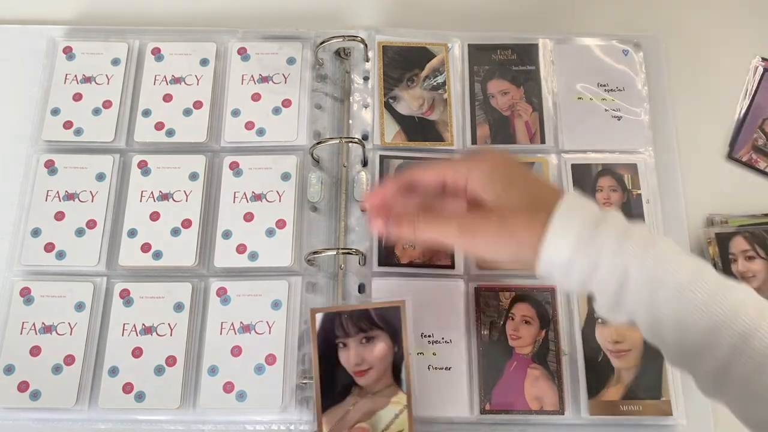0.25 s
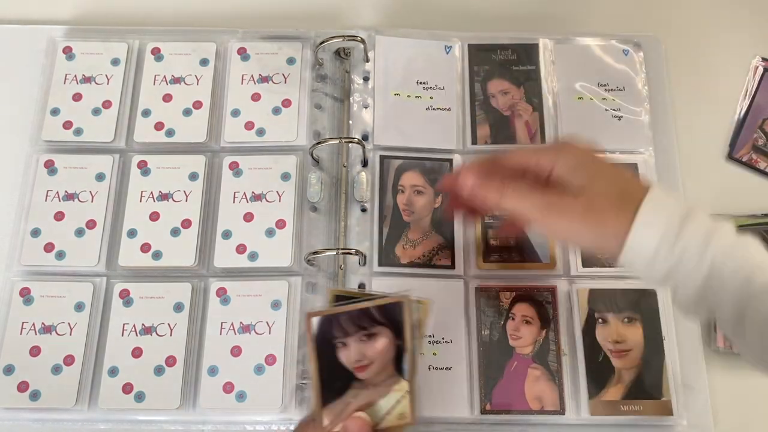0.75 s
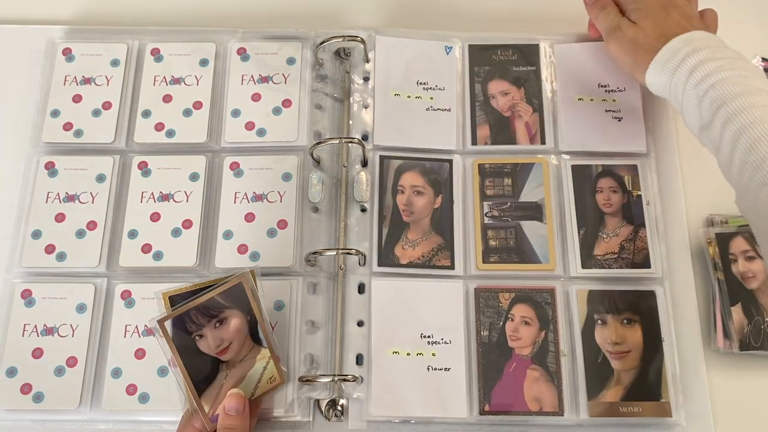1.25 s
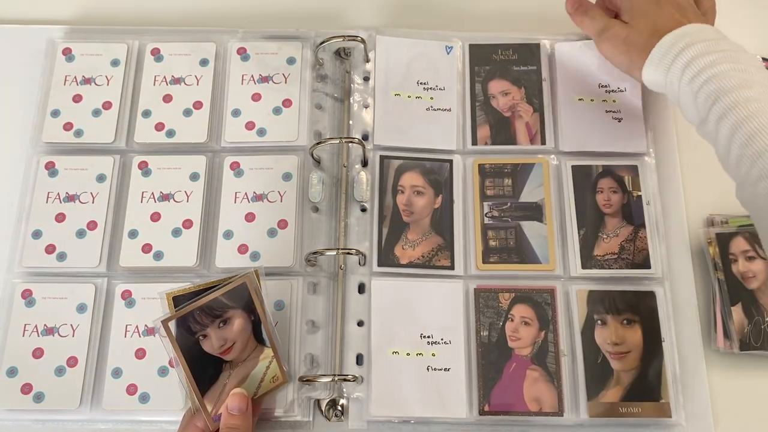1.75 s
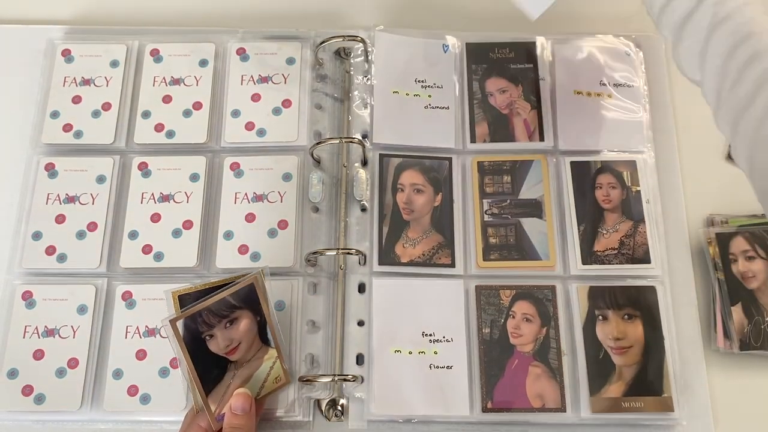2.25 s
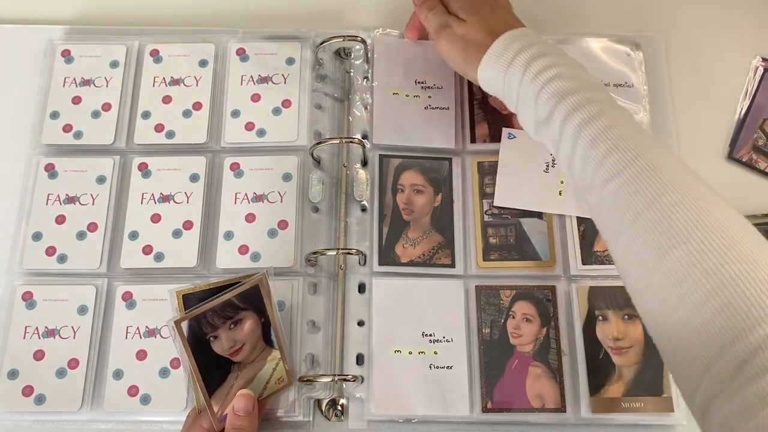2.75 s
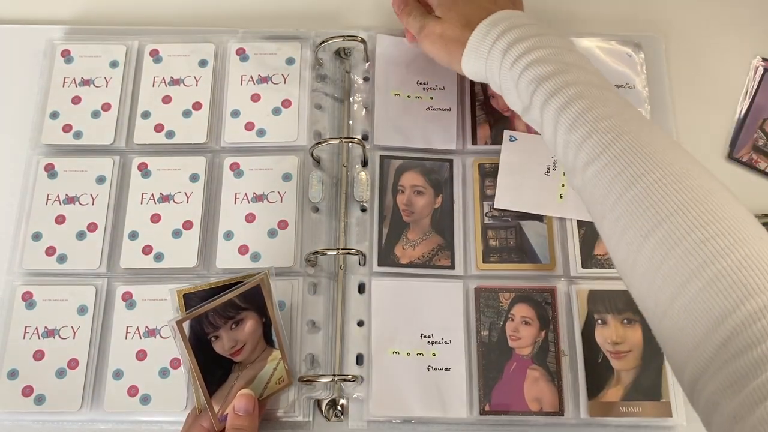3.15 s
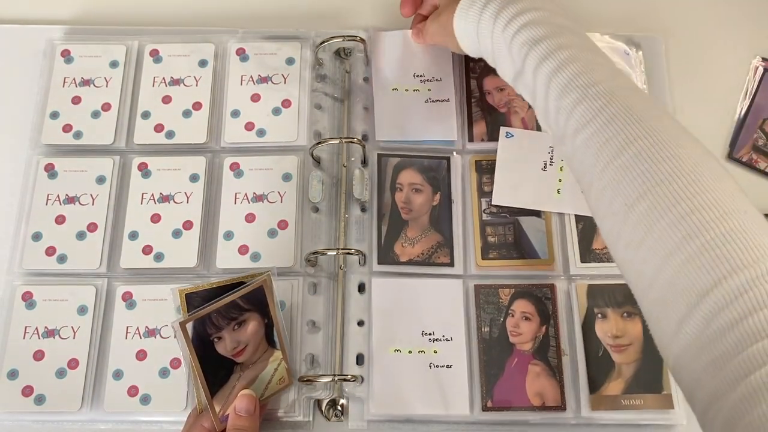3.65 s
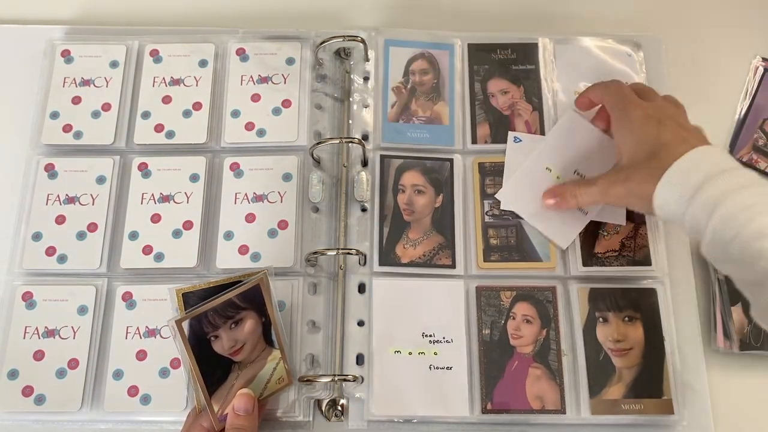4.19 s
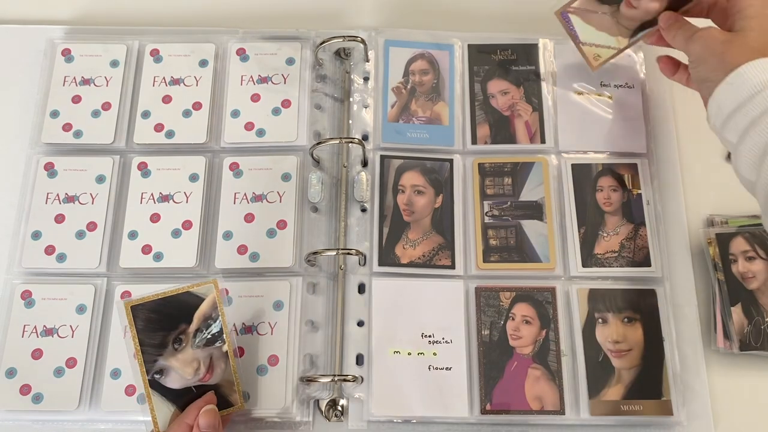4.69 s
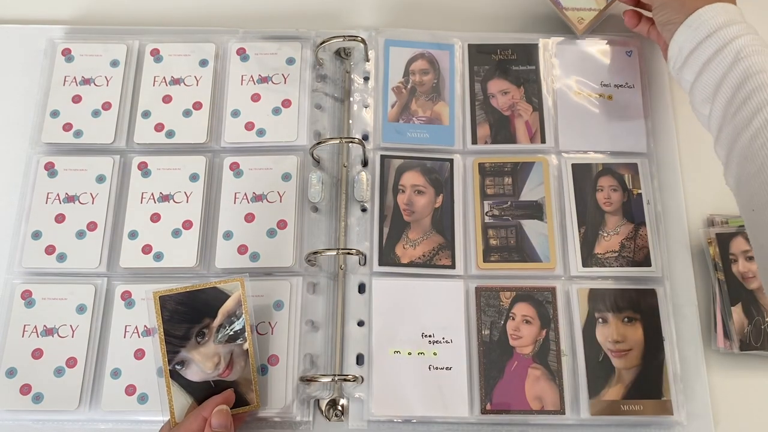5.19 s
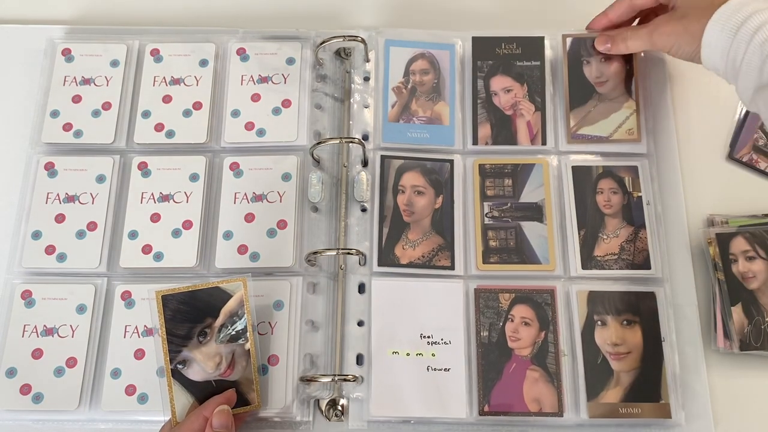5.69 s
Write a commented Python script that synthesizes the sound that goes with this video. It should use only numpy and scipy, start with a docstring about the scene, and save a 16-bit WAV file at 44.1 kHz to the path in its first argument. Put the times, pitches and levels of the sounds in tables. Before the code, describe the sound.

Close to the microphone in a small quiet room, cards slide through plastic binder pockets. Faint ticks and soft rubs come first, then a fuller rustle around two seconds, hard crinkling snaps at three, dense sliding and one very sharp bright click just after four, then mostly quiet with a small crackle.

```python
"""A desk in a small quiet room: a hand slides cards in and out of plastic binder pockets, right under a phone.
Film creases snap as noise bursts around a ring, with a bright edge and the binder's dull modes.
Card rubs on film in short strokes of banded stick-slip noise; soft low thuds are damped sines.
A few thin tones and one faint gliding squeak join in, over a low room tone."""
import sys
import numpy as np
from scipy import signal
from scipy.fft import rfft, irfft
from scipy.io import wavfile
from scipy.ndimage import uniform_filter1d

SR = 44100
rng = np.random.default_rng(int(sys.argv[2]) if len(sys.argv) > 2 else 0)


def output_pcm(signal):
    """Save a mono or channel-first signal as 16-bit PCM at the path in sys.argv[1].

    Samples are clipped to [-1, 1] before scaling.
    """
    pcm = np.clip(np.atleast_2d(signal).T, -1, 1) * 32767
    wavfile.write(sys.argv[1], SR, np.round(pcm).astype(np.int16))


N = 261638

# room tone spectrum before overall scaling: pitch_hz, relative_density_db
AIR_SPECTRUM = [(18, -45), (30, -29), (61, -12.5), (102, -1), (381, -10.5), (718, -13), (1130, -16.5),
                (1840, -18.5), (2980, -26), (4250, -27), (4830, -28.5), (10300, -31), (13000, -29.5)]
# room tone likeness of left and right: pitch_hz, likeness (1 same, -1 opposite)
AIR_LIKENESS = [(60, 1), (130, 0.92), (290, 0.93), (640, 0.076), (1410, -0.94), (3100, 0.047),
                (6820, 0.188), (15000, -0.43)]
# phase-gap strength between the microphone ports, before trim and wander: pitch_hz, relative_side_db
PORT_SIDE = [(60, -21.5), (200, -15), (700, -5), (1300, 1.5), (2400, -8.5), (4400, -8), (8000, 0.5),
             (11000, -11.5), (12000, 4), (13500, 21.5)]
# where the hand is: time_s, left_minus_right_db
HAND_PAN = [(0, 0), (1, 0), (2.5, -0.5), (3.1, -1), (4.1, -1), (4.2, 0.7), (4.5, 0.2), (5.2, -1), (5.93, 1)]
# one faint gliding squeak: start_s, length_s, level_db, from_hz, to_hz
SQUEAK_GLIDE = (5.08, .145, -80, 2050, 1730)
# short thin tones sounding with a knock or snap: start_s, level_db, pitch_hz, t60_s
THIN_TONES = [(.577, -58, 5650, .075), (2.357, -39, 3220, .022), (4.2321, -7, 10500, .006)]
# hand or card landing on the padded page: start_s, level_db, pitch_hz
LANDINGS = [(0.038, -54, 290), (0.535, -49.5, 163), (0.58, -44, 270), (3.859, -54.5, 276),
            (3.888, -56, 378), (3.966, -53, 212), (4.191, -52, 142), (4.291, -48, 237), (4.34, -48, 433),
            (4.628, -46, 94)]
# strokes of card on film: crest_s, nominal_length_s, level_db, brightness_octaves (above the page drag)
RUB_STROKES = [(0.018, 0.06, -65, 4), (0.031, 0.084, -58, 4), (0.333, 0.043, -64.5, 4.5),
               (0.41, 0.15, -56.5, 5), (0.515, 0.07, -53.5, 4.5), (0.583, 0.038, -50, 1.2),
               (0.679, 0.046, -58, 3), (0.694, 0.022, -57, 3), (0.955, 0.074, -55, 5),
               (1.158, 0.11, -66, 3), (1.442, 0.097, -67.5, 3), (1.769, 0.15, -54.5, 3.5),
               (1.808, 0.16, -51.5, 3.5), (1.941, 0.066, -49.5, 3.5), (1.968, 0.063, -49, 4),
               (2.007, 0.11, -43.5, 4), (2.078, 0.23, -47, 3), (2.187, 0.11, -43.5, 4),
               (2.169, 0.19, -48.5, 2), (2.22, 0.064, -49, 1.8), (2.249, 0.035, -50, 1.4),
               (2.298, 0.026, -53, 2.1), (2.343, 0.15, -50.5, 4.5), (2.379, 0.11, -52, 4.5),
               (2.528, 0.11, -60.5, 4), (2.826, 0.12, -69, 9), (3.106, 0.075, -48.5, 3.5),
               (3.33, 0.044, -51.5, 2.5), (3.392, 0.14, -49, 4), (3.442, 0.07, -44, 1.4),
               (3.543, 0.042, -52, 3), (3.602, 0.04, -56.5, 4), (3.772, 0.042, -48.5, 4),
               (3.83, 0.083, -47, 5), (3.866, 0.03, -44, 4), (3.87, 0.094, -43.5, 4),
               (3.877, 0.075, -60, 0.4), (3.905, 0.12, -43.5, 3), (3.926, 0.056, -45, 2),
               (3.977, 0.056, -51.5, 1.27), (4.048, 0.062, -51, 2.5), (4.124, 0.25, -58.5, 3.5),
               (4.227, 0.19, -46, 4), (4.382, 0.37, -57.5, 0.12), (4.338, 0.046, -48.5, 1.5),
               (4.37, 0.073, -46.5, 4), (4.408, 0.12, -57, 4), (4.64, 0.088, -64.5, 3.5),
               (4.629, 0.17, -62.5, -0.6), (4.719, 0.16, -67.5, 0), (5.041, 0.3, -72.5, 0.4),
               (5.327, 0.053, -55.5, 2), (5.36, 0.058, -49.5, 2), (5.498, 0.14, -59, 4),
               (5.549, 0.24, -65.5, 0), (5.558, 0.1, -61.5, 3.5), (5.64, 0.11, -62, 4)]
# rub layers hiss, crackle, binder scrape, page drag: brightness_octaves
LAYER_OCTAVES = (3.7, 2.1, .9, 0)
# weakening of layers below, above the stroke's brightness: slope_db_per_octave
LAYER_SLOPES = (-9, -7)
# binder modes before each blow's random shift: pitch_hz, level_db, t60_s
BINDER_MODES = [(290, -10, 0.039), (483, -5.5, 0.039), (637, -8.5, 0.045), (808, -3, 0.052),
                (971.5, 0.15, 0.063), (1052, -1, 0.02905), (1248, -16, 0.024), (1500, -1.5, 0.039)]
# creases snapping and card edges tapping: start_s, level_db, film_ring_hz, bright_edge_db, binder_ring_db
# (the last two relative to the snap)
CREASE_SNAPS = [(0.0296, -46.5, 6520, -9, -28), (.039, -53.5, 2900, -25, -25), (.198, -46, 5470, 4, -12.5),
                (.529, -44.5, 4830, 6.5, -11.5), (.576, -36.5, 1560, -12, -5.5),
                (.659, -50, 5550, -24, -37), (.671, -45, 5170, -26, -19), (.711, -48.5, 8760, -4, -42),
                (.836, -57.5, 2290, 4, -11.5), (0.958, -46.5, 2100, 6, -17.5), (1.145, -46.5, 2610, -2, -9),
                (1.171, -48, 1700, 6, -9), (1.211, -52, 2250, 8.5, -14.5), (1.256, -50.5, 7500, 7, -23),
                (1.307, -52, 3650, 0, -28), (1.355, -51, 11600, -10, -20.5), (1.39, -57, 2770, 6, -9),
                (1.609, -54.5, 2650, -5, -13.5), (1.781, -38, 10650, -15, -34),
                (1.788, -45, 1630, -14, -34), (1.801, -39, 3070, -21, -15), (1.918, -47, 9800, -19, -11.5),
                (1.927, -46, 4150, -21, -15.5), (1.94, -44, 2500, -23, -18), (1.946, -39.5, 5500, -19, -34),
                (1.955, -41, 3880, -20, -10.5), (1.981, -40.5, 6050, -15, -23),
                (2.002, -30, 3790, 3, -21.5), (2.06, -32.5, 2320, -28, -10.5),
                (2.086, -50.5, 1200, -30, -5), (2.143, -46.5, 3500, -13, -9), (2.204, -34.5, 2680, 0, -9),
                (2.212, -30.5, 2230, -36, -17.5), (2.22, -40, 1860, -30, -22), (2.285, -39, 905, -51, -9.5),
                (2.356, -34, 3150, -11, -25), (2.371, -45, 3100, -15, -16), (2.623, -53, 11300, -19, -24),
                (2.824, -44.5, 4900, -14, -18), (2.833, -33.5, 4450, -7, -30),
                (2.903, -52.5, 2690, -24, -21), (3.036, -34.5, 4930, -1, -15),
                (3.044, -29.5, 4700, -6, -17.5), (3.046, -23.5, 5050, 5.5, -26),
                (3.092, -23, 4770, -24, -42), (3.098, -20, 2900, 5.5, -29),
                (3.139, -34.5, 4650, 5.5, -17.5), (3.277, -48.5, 4900, 5.5, -43),
                (3.328, -44, 8950, -15, -19), (3.392, -39, 2700, 4, -14.5),
                (3.443, -35.5, 2100, 2.5, -11.5), (3.543, -39, 6620, -28, -15.5),
                (3.641, -44.5, 1750, -12, -37), (3.744, -46.5, 3980, -17, -37),
                (3.785, -35, 4500, -27, -27.5), (3.825, -49, 5250, 9, -25), (3.867, -44, 2620, -8, -9),
                (3.938, -36.5, 11700, -17, -41), (4.05, -29.5, 2700, -31, -22.5),
                (4.053, -24.5, 3190, -37, -33), (4.123, -42, 3340, 1.5, -31),
                (4.189, -53.5, 1400, -5.5, -26), (4.213, -48, 2980, 12, -27),
                (4.2313, -13.5, 10700, 1, -41.5), (4.232, -32, 1680, -30, -19),
                (4.29, -35.5, 3550, -28, -17), (4.338, -38.5, 2850, -28, -6.5),
                (4.398, -32.5, 10330, -37, -29), (4.399, -39, 1500, -30, -22),
                (4.472, -55, 5950, -19.5, -30), (4.495, -48.5, 4140, -39, -14), (5.185, -63, 3900, -5, -35),
                (5.301, -58, 3600, -19.5, -35), (5.336, -42.5, 2940, -19, -38),
                (5.344, -41, 2380, -26.5, -42), (5.351, -37.5, 2230, -30, -39),
                (5.362, -45, 3300, -29, -33), (5.651, -52, 4830, 1, -16), (5.803, -46, 1963, 6.5, -14)]

AIR_DB = -69
ROOM_T60_S, ROOM_DB = 0.19, -12
SIDE_WANDER = 0.67  # depth of the random wavering of the side share
SWELL_SHARE = 0.48  # a free stroke swells over this share of its length
LET_GO_S = 0.0092  # swell of a stroke set loose by a snap
STUCK_S = 0.025  # a snap this close before the crest sets the stroke loose
GRIP_DB, BAND_SLOW_DB, BAND_FAST_DB = 0.9, 1.4, 2.96  # random level spreads of the rub
RELEASE_MS, RELEASE_CYCLES = 0.62, 0.67  # release time plus cycles of the film ring
SETTLE_S, SETTLE_DB = 0.0025, -10  # quick settling after the release
FLUTTER_T60_S, FLUTTER_DB = 0.099, -11.5
BUILD_S, BUILD_DB = 0.0013, -10  # creak growing just before the crease lets go
TOP_HZ = 16700  # upper limit of the sound


def undb(db):
    """Decibels to gain."""
    return 10 ** (np.asarray(db) / 20)


def unit(x):
    """Scale to rms 1."""
    return x / np.sqrt(np.mean(x ** 2))


def peak_unit(x):
    """Scale to peak 1."""
    return x / abs(x).max()


def decay(t, t60_s):
    """Exponential fade of 60 dB in t60_s."""
    return np.exp(-np.log(1000) * t / t60_s)


def band(x, lo_hz, hi_hz, order=2):
    """Band-pass between two edges."""
    edges_hz = [lo_hz, min(hi_hz, 0.45 * SR)]
    return signal.sosfilt(signal.butter(order, edges_hz, "band", fs=SR, output="sos"), x)


def spectrum_curve(table):
    """Interpolate a table's second column over log frequency."""
    log_hz = np.log(np.maximum(np.arange(N // 2 + 1) * SR / N, 1))
    hz, value = np.transpose(table)
    return np.interp(log_hz, np.log(hz), value)


def add(out, start_s, x):
    """Mix x into out from start_s."""
    i = int(start_s * SR)
    out[i:i + len(x)] += x[:len(out) - i]


def event():
    """Empty track and the time axis of one short event."""
    return np.zeros(N), np.arange(int(0.15 * SR)) / SR


def walk(rate_hz):
    """Random levels held 1 / rate_hz and slewed twice; spread near 1."""
    hold = int(SR / rate_hz)
    steps = np.repeat(rng.standard_normal(N // hold + 1), hold)
    return 1.3 * uniform_filter1d(uniform_filter1d(steps, hold), hold)[:N]


def grit(rate_hz, spread_db):
    """Sparse slips of very uneven size, scaled to rms 1."""
    slips = (rng.random(N) < rate_hz / SR) * rng.standard_normal(N)
    return unit(slips * undb(spread_db * rng.exponential(size=N)))


def air():
    """Room tone: noise mostly low; left and right share more or less of it by pitch."""
    gain = undb(spectrum_curve(AIR_SPECTRUM))
    like = np.clip(spectrum_curve(AIR_LIKENESS), -0.99, 0.99)
    mid, side = (irfft(rfft(rng.standard_normal(N)) * gain * np.sqrt(1 + sign * like), N) for sign in (1, -1))
    level = undb(AIR_DB + 0.27 * walk(1.0))
    return level * np.array([mid + side, mid - side]) / mid.std()


def room(x):
    """A short damped room tail of decaying noise, different on each side."""
    t = np.arange(int(0.4 * SR)) / SR
    tail = rng.standard_normal((2, len(t))) * decay(t, ROOM_T60_S) * np.minimum(t / 0.0015, 1)
    echo = undb(ROOM_DB) * tail / np.sqrt((tail ** 2).sum(axis=1, keepdims=True))
    return signal.fftconvolve(x[None], echo, axes=1)[:, :N]


def ports(x):
    """Two ports hear the same sound with a phase gap that depends on pitch and wavers at random."""
    quarter_turn = 1j * undb(spectrum_curve(PORT_SIDE) - 4.5)
    side = irfft(rfft(x) * quarter_turn, N)
    side = side * (1 + SIDE_WANDER * walk(40))
    return np.array([x + side, x - side])


def squeak():
    """A thin tone that slides down in two swells."""
    start_s, length_s, level_db, from_hz, to_hz = SQUEAK_GLIDE
    part = np.clip((np.arange(N) / SR - start_s) / length_s, 0, 1)
    hz = from_hz + (to_hz - from_hz) * part
    swells = abs(np.sin(2 * np.pi * part))
    return undb(level_db) * swells * np.sin(2 * np.pi * np.cumsum(hz) / SR)


def pings():
    """Thin tones: sines with a two-cycle attack and an exponential fade."""
    out, t = event()
    for start_s, level_db, hz, t60_s in THIN_TONES:
        tone = np.sin(2 * np.pi * hz * t) * np.minimum(t * hz / 2, 1)
        add(out, start_s, undb(level_db) * tone * decay(t, t60_s))
    return out


def thuds():
    """A soft push on the padded page: a few damped low cycles."""
    out, t = event()
    push = (t / 0.0048) * np.exp(1 - t / 0.0045)
    for start_s, level_db, hz in LANDINGS:
        tone = np.sin(2 * np.pi * hz * t) + 0.38 * np.sin(2 * np.pi * 1.7 * hz * t)
        add(out, start_s, undb(level_db) * tone * push)
    return out


def stroke_levels():
    """Gain of each rub layer over time; each stroke swells and fades, the loudest one wins."""
    t, loud = np.arange(N) / SR, np.zeros((len(LAYER_OCTAVES), N))
    for crest_s, length_s, level_db, octaves in RUB_STROKES:
        loosed = any(0 <= crest_s - snap[0] < STUCK_S for snap in CREASE_SNAPS)
        rise_s = LET_GO_S if loosed else SWELL_SHARE * length_s
        fall_s = max(length_s - rise_s, rise_s / 2)
        off = np.array(LAYER_OCTAVES) - octaves
        layer_db = level_db + np.where(off < 0, *LAYER_SLOPES) * abs(off)
        ramp = np.interp(t, [crest_s - rise_s, crest_s, crest_s + fall_s], [0, 1, 0])
        swell = np.sin(np.pi / 2 * ramp) ** 1.2
        loud = np.maximum(loud, undb(layer_db)[:, None] * swell)
    return loud


def rub():
    """Dense stick-slip between card and film; the grip flickers, and each band flickers on its own."""
    hiss, crackle, scrape, drag = stroke_levels()
    grip_db = GRIP_DB * walk(60)
    fine_slips = grit(2000, 0.87) + 0.89 * rng.standard_normal(N)
    coarse_slips = grit(2500, 1.0) + 0.89 * rng.standard_normal(N)
    drag_slips = rng.standard_normal(N) + 0.77 * grit(400, 2.2)
    # nominal band edges in Hz, slips, gain
    layers = (
        ((470, 580, 720), drag_slips, drag),
        ((960, 1010), drag_slips, undb(-6) * scrape),
        ((1560, 2310, 2854, 4100), coarse_slips + 0.5 * fine_slips, crackle),
        ((4700, 6450, 9370, 10900, 14080), fine_slips, hiss),
    )
    out = np.zeros(N)
    for edges_hz, slips, gain in layers:
        for lo_hz, hi_hz in zip(edges_hz, edges_hz[1:]):
            flicker_db = grip_db + BAND_SLOW_DB * walk(25) + BAND_FAST_DB * walk(79)
            flicker = undb(flicker_db) / np.sqrt(len(edges_hz) - 1)
            # widened so that neighbouring bands overlap
            out += gain * flicker * unit(band(slips, 0.81 * lo_hz, 1.17 * hi_hz, order=3))
    return out


def binder(t, chance):
    """Decaying binder modes after one blow, with random levels and slight pitch shifts."""
    hz, level_db, t60_s = np.transpose(BINDER_MODES)[:, :, None]
    hz = hz * (1 + 0.044 * chance[::-1, None])
    rings = undb(level_db + 2.9 * chance[:, None]) * np.sin(2 * np.pi * hz * t)
    return (rings * decay(t, t60_s)).sum(axis=0) * np.minimum(t / 0.0031, 1)


def snaps():
    """A crease creaks and lets go: a burst rings the free film, the sheet flutters on, the binder rings."""
    out, t = event()
    for start_s, level_db, hz, edge_db, binder_db in CREASE_SNAPS:
        life_s = RELEASE_MS / 1000 + RELEASE_CYCLES / hz
        noise, chance = rng.standard_normal((2, len(t))), rng.standard_normal(len(BINDER_MODES))
        release = (t / life_s) ** 4 * np.exp(4 - 4 * t / life_s)
        settling = undb(SETTLE_DB) * np.exp(-t / SETTLE_S)
        flutter = undb(FLUTTER_DB) * decay(t, FLUTTER_T60_S)
        shape = release + (settling + flutter) * np.minimum(t / life_s, 1) ** 3

        film = unit(band(noise[0], hz * 0.42, hz * 1.25, order=1)) * (shape - 0.5 * release)
        film = film + 3.5 * release * np.sin(2 * np.pi * hz * t)
        broad = band(noise[0] * shape, hz * 0.38, hz * 2.0)
        edge = band(noise[1] * shape, 10000, 22000)
        crack = peak_unit(film) + undb(-4.5) * peak_unit(broad) + undb(edge_db) * peak_unit(edge)
        flicker = 1 + 5 * band(noise[1], 40, 140)  # random low-rate flicker of the ring's level
        ring = binder(t, chance) * flicker
        add(out, start_s, undb(level_db) * (crack + undb(binder_db) * ring))

        # reversed fade: the creak ends at the release peak
        creak = band(noise[1], hz / 2, hz * 2)[:600] * np.exp(-t[:600] / BUILD_S)
        add(out, start_s + life_s - t[600], undb(level_db + BUILD_DB) * peak_unit(creak[::-1]))
    return out


def scene():
    """Hand sounds placed between the two ports, their echoes, centred thuds and the room tone."""
    time_s, pan_db = np.transpose(HAND_PAN)
    pan_db = np.interp(np.arange(N) / SR, time_s, pan_db)
    hand = snaps() + pings() + rub() + squeak()
    direct = ports(hand) * undb(np.array([pan_db, -pan_db]) / 2)
    return direct + room(hand) + thuds() + air()


def record(dry):
    """Deep bass is cut, a peak sits near 10 kHz, sound above 13.2 kHz is very weak, little remains above TOP_HZ."""
    dry = signal.sosfilt(signal.butter(2, 55, "high", fs=SR, output="sos"), dry)
    dry = dry + 0.21 * band(dry, 9800, 10450, order=1)
    dull = signal.sosfiltfilt(signal.butter(20, 13200, fs=SR, output="sos"), dry)
    shelved = dull + undb(-27.5) * (dry - dull)
    return signal.sosfilt(signal.ellip(10, 0.2, 80, TOP_HZ, fs=SR, output="sos"), shelved)


dry = scene()
out = record(dry)
output_pcm(out)
```